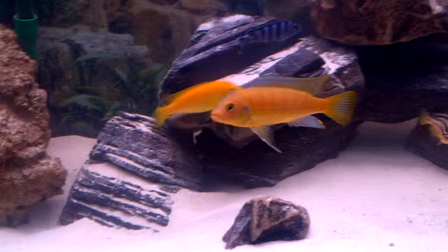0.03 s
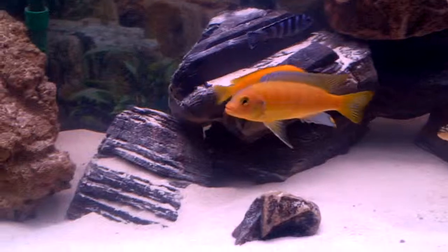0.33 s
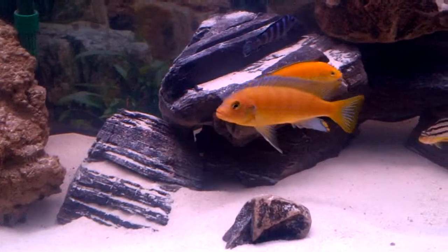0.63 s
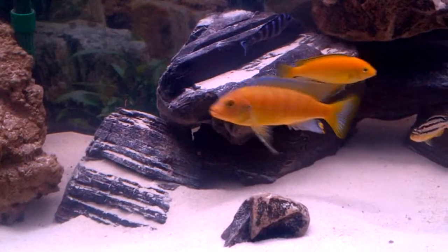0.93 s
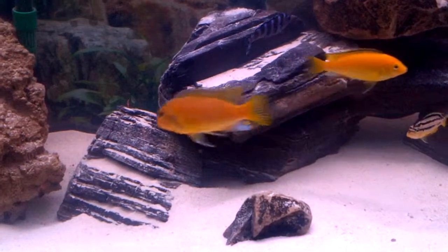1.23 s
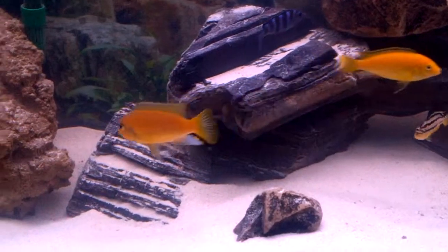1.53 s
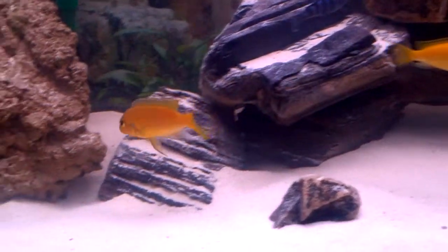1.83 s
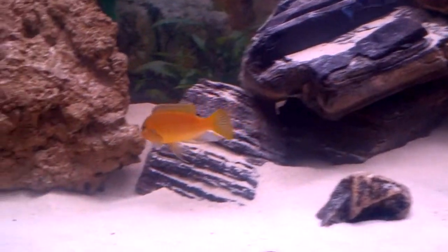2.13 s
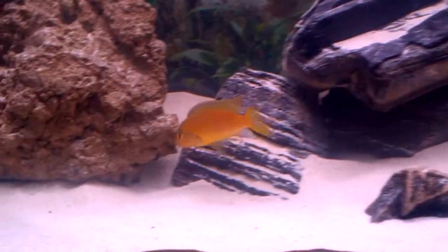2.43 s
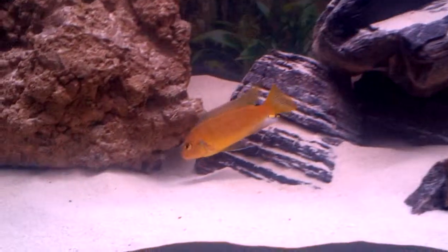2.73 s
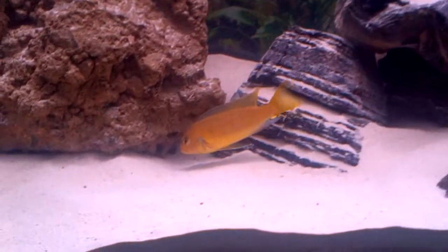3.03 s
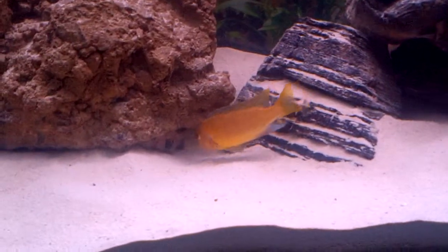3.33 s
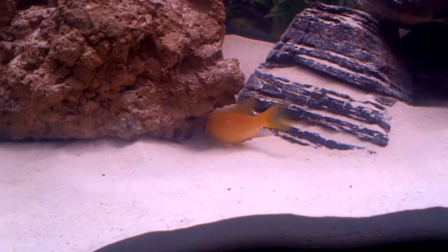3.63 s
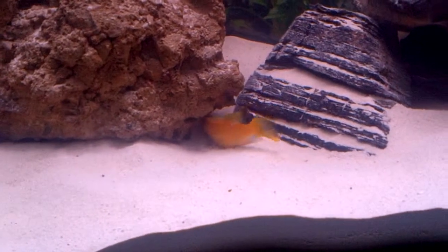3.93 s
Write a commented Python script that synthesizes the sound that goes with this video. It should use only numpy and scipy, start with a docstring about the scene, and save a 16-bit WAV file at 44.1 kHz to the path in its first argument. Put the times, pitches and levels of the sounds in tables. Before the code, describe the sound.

An aquarium pump hums low and steady beside a fish tank in a quiet room, over soft rumble and microphone hiss. Early on come a soft tick, a faint scuff and a second tick, and the hum carries on.

```python
"""Just after the start, the sound of a quiet room cuts in, heard through a stereo microphone.
From then on an aquarium pump beside a fish tank hums on mains power, with weak motor tones and
rumbling air under the hum and microphone hiss above it. A soft tick comes at half a second.
Around one second something faintly scuffs a surface, its tiny slips making it ring, and a second
tick follows. The hum and its background carry on to the end."""
import sys
import numpy as np
from scipy import signal
from scipy.fft import rfft, irfft
from scipy.io import wavfile
from scipy.ndimage import uniform_filter1d

SR = 44100
rng = np.random.default_rng(int(sys.argv[2]) if len(sys.argv) > 2 else 0)


def transcribe(signal):
    """Save signal, clipped to [-1, 1], as a 16-bit WAV file at the path in sys.argv[1]."""
    frames = np.atleast_2d(signal).T
    limited = np.clip(frames, -1, 1)
    pcm = np.round(limited * 32767).astype(np.int16)
    wavfile.write(sys.argv[1], SR, pcm)


N = 176400

# The tones in the pump's hum: mains_multiple, midway_level_db, drift_db_per_s, left_louder_db, left_lead_rad
HUM_TONES = [(1, -53.5, -1, -15, 1.4), (2, -35.5, -0.23, 0.7, -0.21), (4, -49.5, -.5, -.8, -0.18),
             (5, -54, 0.77, 0.2, -0.041), (7, -58, 1.3, 4, 1.52), (8, -70.5, -2, -1, .3)]
# Weaker tones of turning motors: pitch_hz, level_db, left_lead_rad
MOTOR_TONES = [(12.2, -45.5, 0.35), (25.7, -53.5, .5), (30.8, -54, 2.1), (42.8, -51.5, .4), (91.2, -63, 3),
               (108.2, -58, .2), (146.1, -53, .2), (215.4, -57, .3), (829, -74, 0.87), (1513, -79, 1)]
# Soft ticks: start_s, level_db, pitch_hz
TICKS = [(.5205, -33.5, 1000), (1.226, -40, 850)]
# Faint scuffs: start_s, length_s, level_db, brightness_db_per_octave
SCUFFS = [(.928, .045, -51.3, -2), (.985, .03, -62, 1), (1.063, .004, -60, 1), (1.143, .012, -61, 6)]
# The pitches at which the rubbed surface rings: pitch_hz, width_hz, level_db
SURFACE_RINGS = [(1470, 250, 1), (1974, 140, -1), (2200, 100, -2.5), (3270, 570, -5)]
# Room air that is the same on both sides: pitch_hz, level_db_per_hz
AIR_SHARED = [(10, -66.5), (55, -64), (90, -70.5), (170, -70.5), (300, -76), (500, -82), (800, -85.5),
              (1200, -90), (2500, -96.5), (5000, -108), (16000, -125)]
# Room air that is added on the left and subtracted on the right: pitch_hz, level_db_per_hz
AIR_OPPOSITE = [(10, -69), (45, -64.5), (90, -69.5), (170, -74.5), (300, -78), (500, -83.5), (800, -87.5),
                (1200, -89), (2500, -96), (5000, -101), (16000, -118)]
# Microphone hiss: pitch_hz, level_db_per_hz
MIC_HISS = [(500, -97), (3000, -91), (5500, -92.5), (7300, -92), (8800, -93), (12000, -93), (15500, -93.5)]
# Small changes in overall volume: time_s, gain_db
VOLUME_CURVE = [(.1, -1.6), (.45, -0.5), (1.1, -0.75), (2, -1), (3, -0.5), (4, -0.9)]

MAINS_HZ, WAVERS_PER_S = 60.01, 3
RUMBLE_BELOW_HZ = 75
RUMBLE_LEFT_DB, AIR_LEFT_DB, HISS_LEFT_DB = 2, 0.4, -0.5  # how much louder the left side is


def pump(t, main_waver_db=0.15, other_waver_db=0.6):
    """Mains power shakes the pump at multiples of its rate; twice that rate is the main hum."""
    out = 0
    for multiple, db, drift, left_db, lead in HUM_TONES:
        waver_db = main_waver_db if round(multiple) == 2 else other_waver_db
        level_db = db + drift * (t - t.mean()) + waver_db * wander(WAVERS_PER_S)
        phase = 2 * np.pi * round(multiple) * MAINS_HZ * t
        out = out + undb(level_db) * pan(left_db) * stereo_tone(phase, lead)
    return out


def motors(t, waver_db=3.5, waver_rad=0.52):
    """Turning motors add weak tones that waver in loudness and slightly in pitch."""
    out = 0
    for hz, db, lead in MOTOR_TONES:
        gain = undb(db + waver_db * wander(WAVERS_PER_S))
        sides = pan(RUMBLE_LEFT_DB if hz < RUMBLE_BELOW_HZ else AIR_LEFT_DB)
        phase = 2 * np.pi * hz * t + waver_rad * wander(WAVERS_PER_S)
        out = out + gain * sides * stereo_tone(phase, lead)
    return out


def ticks(t, fade_s=0.0006):
    """Small dull ticks that die away within a few vibrations."""
    out = 0
    for start, db, hz in TICKS:
        age = np.maximum(t - start, 0)
        out = out + undb(db) * np.exp(-age / fade_s) * np.sin(2 * np.pi * hz * age)
    return out


def scuffs(t, rise_s=0.0039, fade_s=0.022, slips_per_s=1500):
    """Rubbing is a crowd of tiny slips, and each one makes the surface ring briefly."""
    out = 0
    lowest_hz = SURFACE_RINGS[0][0]
    for start, length, db, brightness in SCUFFS:
        slips = rng.standard_normal((3, N)) * (rng.random((3, N)) < slips_per_s / SR)
        push = slips[:2] + slips[2]  # each side gets its own slips plus a shared set
        ring = 0
        for hz, width, ring_db in SURFACE_RINGS:
            gain = undb(ring_db + brightness * np.log2(hz / lowest_hz))
            ring = ring + gain * resonate(push, hz, width)
        rise = np.clip((t - start) / rise_s, 0, 1)
        fade = np.exp(-np.maximum(t - start - length, 0) / fade_s)
        out = out + undb(db) * rise * fade * ring / ring.std()
    return out


def room_air(swell_db=0.15, rumble_flicker_db=2, air_flicker_db=1.0):
    """Room noise in octave-wide bands that swell slowly together while each flickers on its own."""
    out = 0
    swell = swell_db * wander(per_s=2.33)
    octave = np.log2(np.maximum(np.arange(N // 2 + 1) * SR / N, 1))
    for centre in range(3, 15):  # bands centred from 8 Hz to about 16 kHz
        window = np.sqrt(np.maximum(1 - abs(octave - centre), 0))
        is_rumble = 2 ** centre < RUMBLE_BELOW_HZ
        band = noise(AIR_SHARED, window) + np.array([[1], [-1]]) * noise(AIR_OPPOSITE, window)
        flicker = (rumble_flicker_db if is_rumble else air_flicker_db) * wander(per_s=20)
        out = out + band * undb(swell + flicker) * pan(RUMBLE_LEFT_DB if is_rumble else AIR_LEFT_DB)
    return out


def microphone_hiss():
    """Each side of the microphone makes its own smooth hiss."""
    return np.array([noise(MIC_HISS), noise(MIC_HISS)]) * pan(HISS_LEFT_DB)


def undb(db):
    """Turn decibels into a number to multiply the sound by."""
    return 10 ** (np.asarray(db) / 20)


def wander(per_s):
    """A smooth random curve, roughly 1 in size, that heads for a new value per_s times a second."""
    hold = int(SR / per_s)
    steps = np.repeat(rng.standard_normal(256), hold)[:N]
    return 1.3 * uniform_filter1d(uniform_filter1d(steps, hold), hold)


def pan(left_db):
    """Left and right gains that make the left side louder by left_db."""
    return undb(np.array([[left_db], [-left_db]]) / 2)


def noise(points, window=1):
    """Noise shaped by (pitch_hz, level_db_per_hz) points; a window keeps just one band of it."""
    hz, db = np.array(points).T
    all_hz = np.arange(N // 2 + 1) * SR / N
    level_db = np.interp(np.log(np.maximum(all_hz, 1)), np.log(hz), db)
    gain = undb(level_db) * np.sqrt(SR / 2)
    return irfft(rfft(rng.standard_normal(N)) * gain * window, N)


def resonate(x, hz, width):
    """Keep the sound near one pitch, filtering twice for a sharper peak."""
    b, a = signal.iirpeak(hz, hz / width, fs=SR)
    return signal.lfilter(b, a, signal.lfilter(b, a, x))


def stereo_tone(phase, lead):
    """A pure tone that reaches the left side ahead of the right by lead radians."""
    return np.sqrt(2) * np.sin(phase + rng.uniform(0, 2 * np.pi) + np.array([[lead], [-lead]]) / 2)


def scene():
    """The pump, its background and the small noises, added together."""
    t = np.arange(N) / SR
    return pump(t) + motors(t) + room_air() + microphone_hiss() + scuffs(t) + ticks(t)


def record(dry):
    """The sound cuts in from near silence, drifts a little in volume and loses its highest treble."""
    cut_in_s, quiet_db, top_hz = 0.105, -65, 15750
    t = np.arange(N) / SR
    volume_db = np.interp(t, *np.array(VOLUME_CURVE).T)
    gain = undb(np.where(t < cut_in_s, quiet_db, volume_db))
    treble_cut = signal.ellip(12, .1, 80, top_hz, fs=SR, output="sos")
    return signal.sosfilt(treble_cut, dry * gain)


dry = scene()
out = record(dry)
transcribe(out)
```